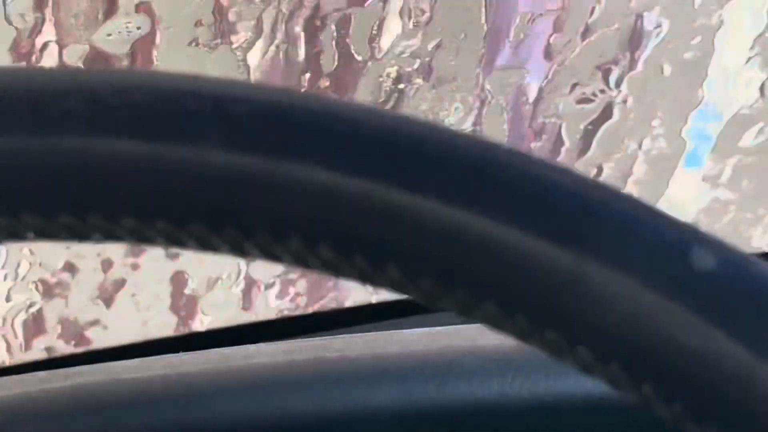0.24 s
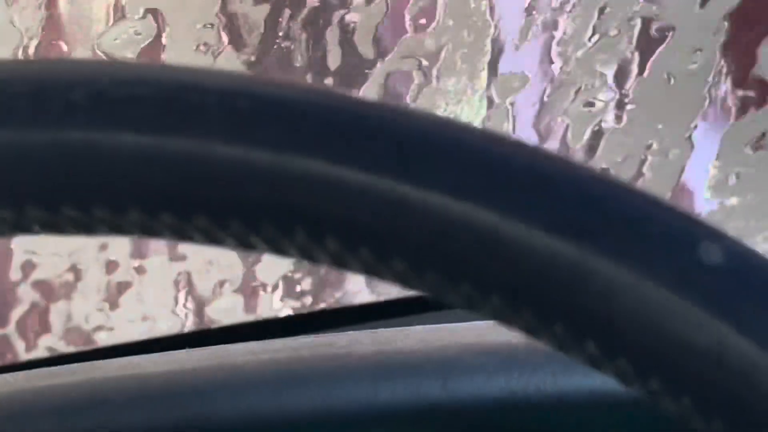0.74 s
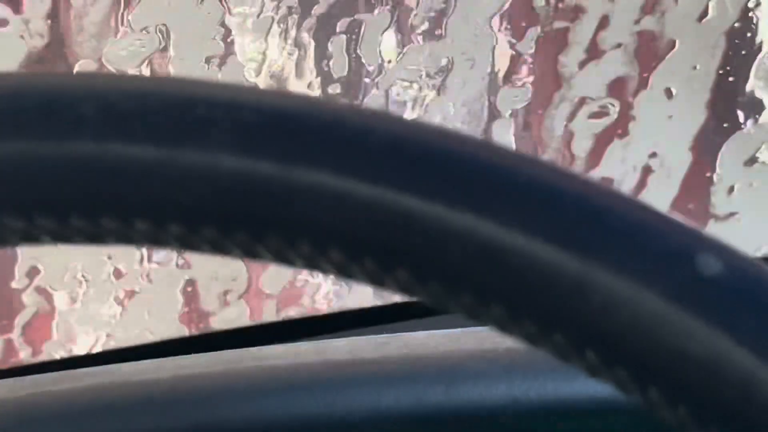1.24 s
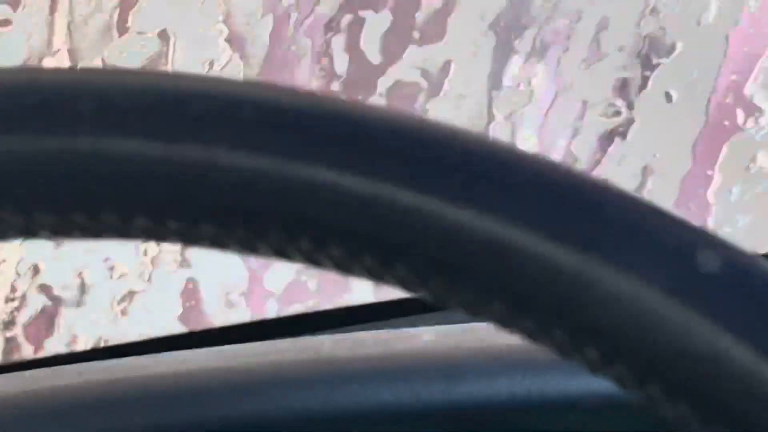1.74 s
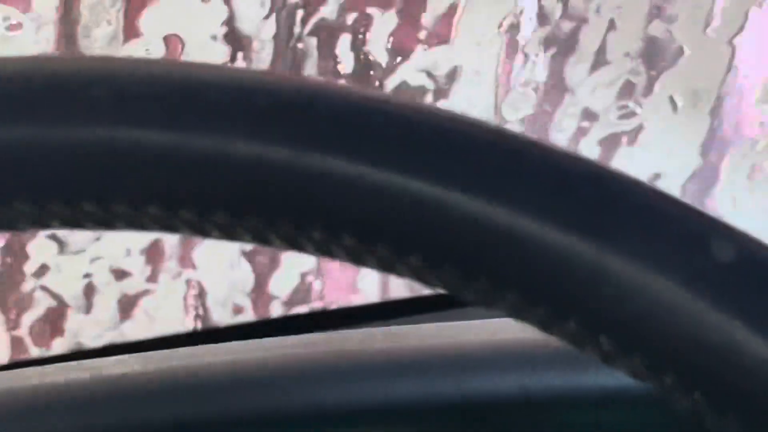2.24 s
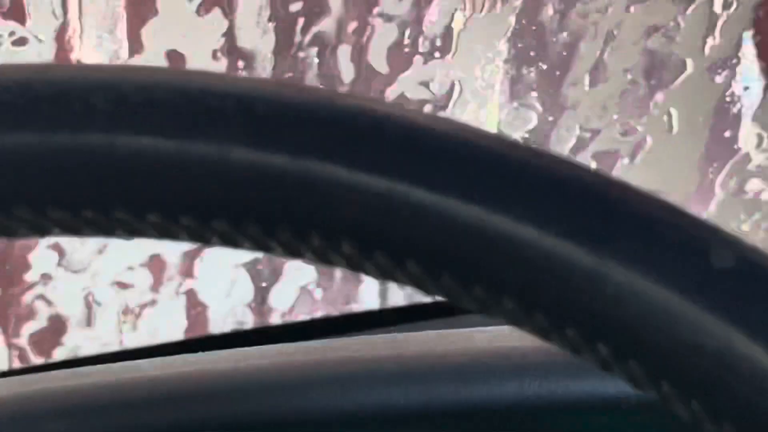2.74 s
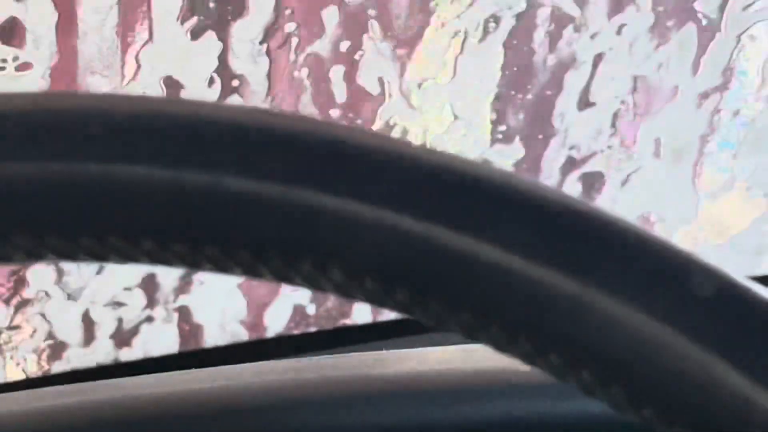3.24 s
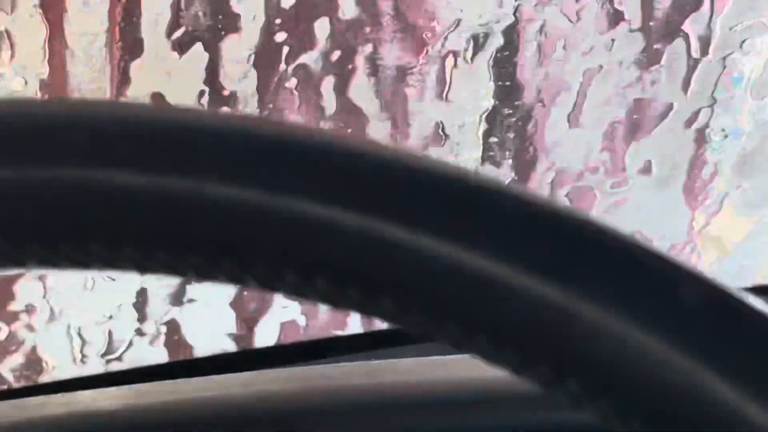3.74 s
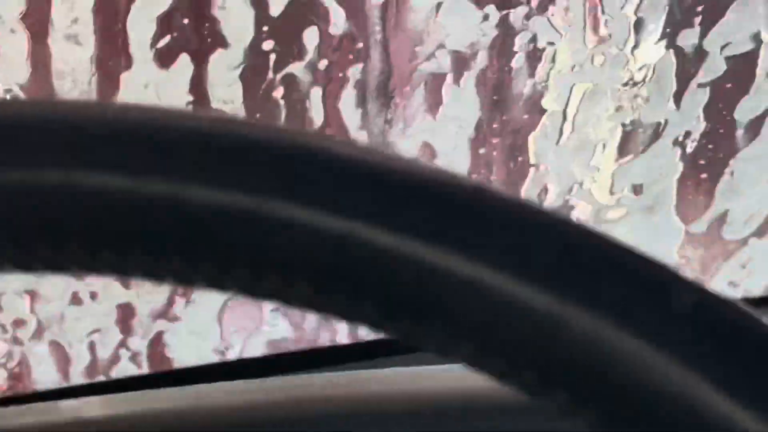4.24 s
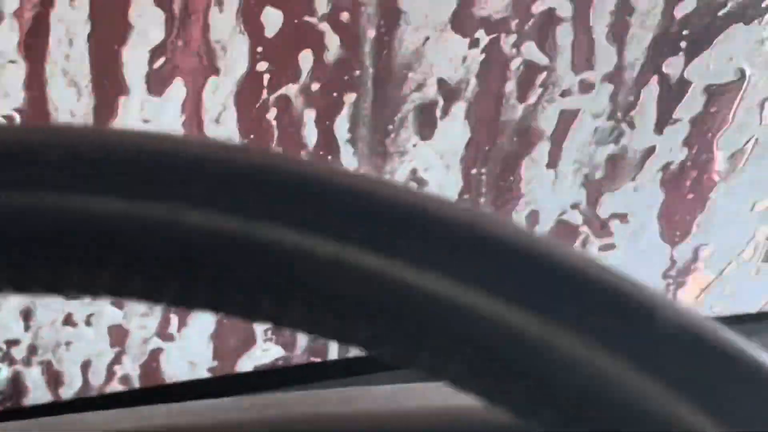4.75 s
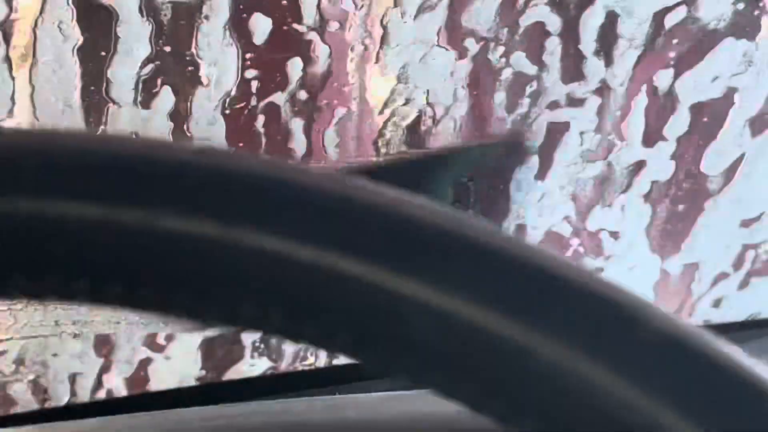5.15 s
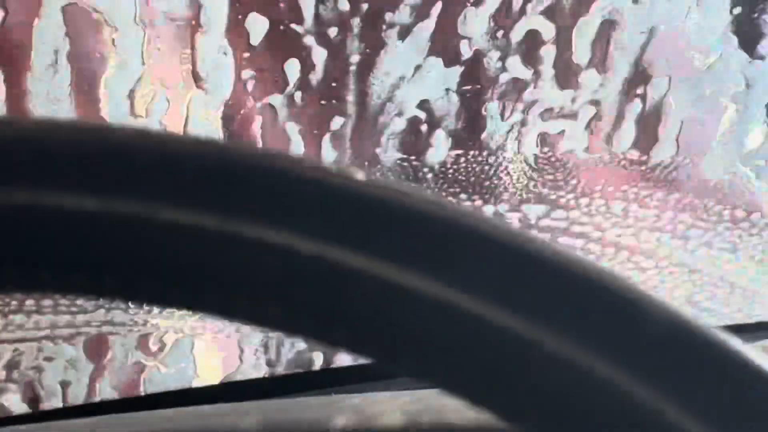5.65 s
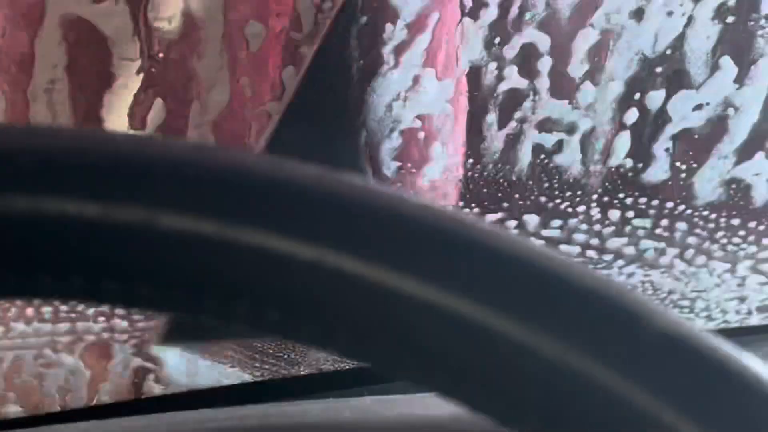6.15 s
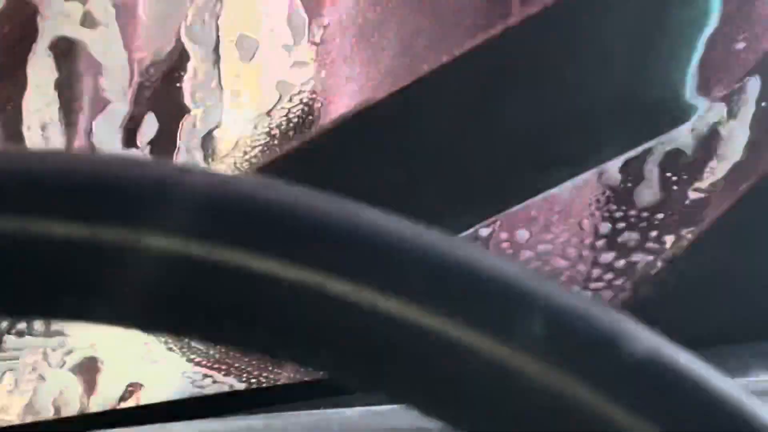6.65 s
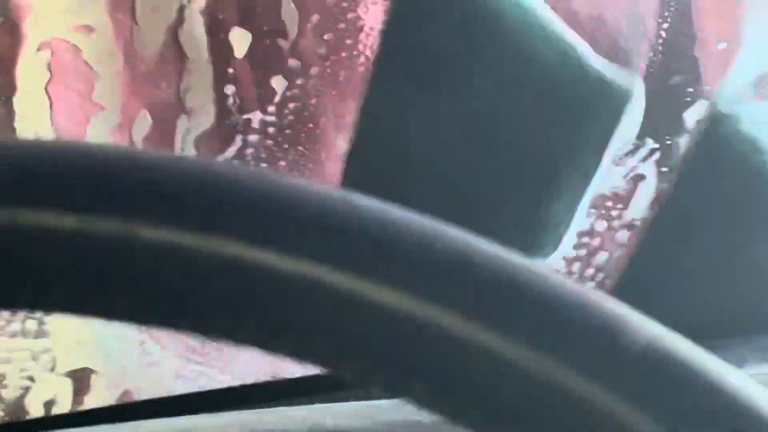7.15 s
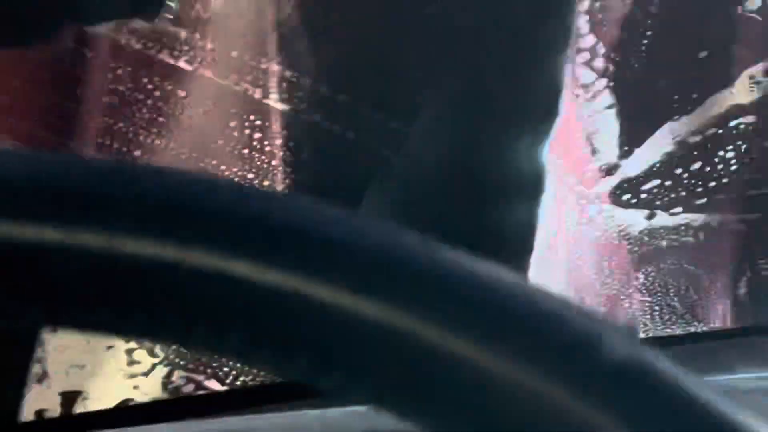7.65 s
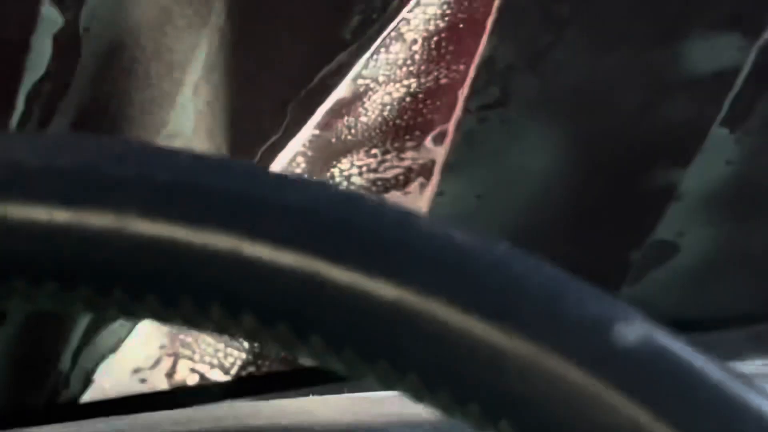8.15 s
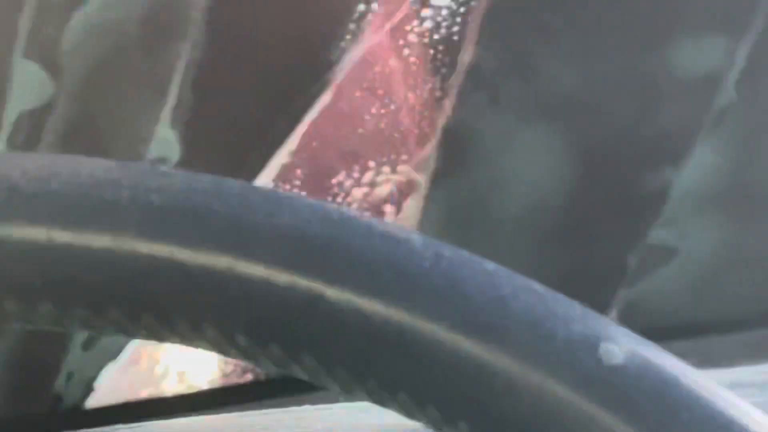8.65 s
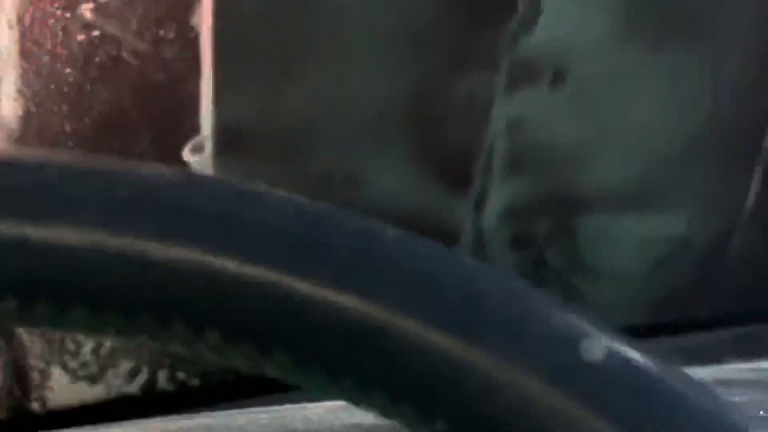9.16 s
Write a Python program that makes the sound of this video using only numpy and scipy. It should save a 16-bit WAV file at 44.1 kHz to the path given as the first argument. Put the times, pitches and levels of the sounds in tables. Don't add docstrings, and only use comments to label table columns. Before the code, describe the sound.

Inside a closed car in a wash tunnel, deep machinery throb and pump hum under steady water rumble, with wet cloth strips slapping the glass.

```python
import sys
import numpy as np
from scipy import signal
from scipy.fft import rfft, irfft, next_fast_len
from scipy.io import wavfile
from scipy.ndimage import uniform_filter1d, map_coordinates

SR = 44100
rng = np.random.default_rng(int(sys.argv[2]) if len(sys.argv) > 2 else 0)


def unload_wav(signal):
    wavfile.write(
        sys.argv[1],
        SR,
        np.round(np.clip(np.atleast_2d(signal).T, -1, 1) * 32767).astype(np.int16),
    )


def convert_level_to_amplitude(level_db):
    exponent = np.asarray(level_db, float) / 20
    return 10 ** exponent


N = 414981
TIME = np.arange(N) / SR


def unit(x):
    return x / np.sqrt(np.mean(x ** 2) + 1e-20)


def along(points, hz):
    f, v = np.transpose(points)
    return np.interp(np.log(hz + 1), np.log(f + 1), v)


def level_curve(rows):
    s, db = np.transpose(rows)
    return np.interp(TIME, s, db)


def wobble(rate):
    knots = rng.standard_normal(N // 1000)
    return map_coordinates(knots, [TIME * rate])


def filtered(x, response):
    m = next_fast_len(N + SR // 2)
    spectrum = rfft(x, m) * response(np.fft.rfftfreq(m, 1 / SR))
    return irfft(spectrum, m)[..., :N]


def tone(hz, db, drift):
    phase = 2 * np.pi * (np.cumsum(hz * np.ones(N)) / SR + rng.random()) + drift * wobble(1.491)
    direct = np.sin(phase)
    around = 0.64 * np.cos(phase + wobble(0.85))
    return np.sqrt(2) * convert_level_to_amplitude(db) * np.array([direct, around])


def beat(hz, in_step_s):
    weaker = 0.7
    turn = 2 * np.pi * hz * (TIME - in_step_s)
    return 10 * np.log10(1 + weaker ** 2 + 2 * weaker * np.cos(turn) + 1e-4)


# time in seconds, level in dB, half length in seconds.
VANE_SWELLS = [(0.266, -31.5, 0.11), (0.833, -28.5, 0.037), (1.317, -27, .07), (1.89, -30.5, 0.095),
               (2.144, -28.5, 0.055), (2.69, -38.5, 0.12), (3.215, -30.5, 0.21), (3.59, -27, 0.22),
               (4.054, -29.5, 0.1), (4.518, -36, .25), (5.38, -29, 0.071), (5.69, -28.5, 0.094),
               (6.315, -31.5, 0.12), (6.548, -29, .12), (7.326, -40.5, 0.36), (7.907, -32, 0.13),
               (8.216, -33.5, 0.072), (8.53, -32.5, 0.17), (8.965, -34, .1)]


def whine_swells():
    t = np.arange(0, N, 64) / SR
    gain = convert_level_to_amplitude(-38.5)
    for s, db, half_s in VANE_SWELLS:
        gain = gain + convert_level_to_amplitude(db) * np.exp(-((t - s) / half_s) ** 2)
    return np.interp(TIME, t, 20 * np.log10(gain))


# time in seconds, throb level in dB.
DRIVE_LOAD = [(0.0, -15.5), (1.8, -16.5), (2.1, -18.5), (4.2, -21.5), (4.45, -14.5), (5.0, -18.5),
              (6.0, -18.5), (7.1, -19), (7.4, -12.5), (7.68, -21.5), (7.95, -14), (8.5, -21), (9.28, -14),
              (9.41, -17)]
# order as a multiple of shaft speed, rms level in dB.
DRIVE_ORDERS = [(5, -27.5), (6, -28), (7, -29), (13, -33), (16, -36.5), (17, -41.5)]
PUMP_ORDERS = [(3, -32.5), (4, -34.5), (5, -44), (6, -40.5), (7, -47)]
FAN_ORDERS = [(1, -29.5), (2, -45)]


def machinery():
    drive_hz, pump_hz, fan_hz = 8.846, 59.13, 156.6
    throb = tone(8 * drive_hz, level_curve(DRIVE_LOAD), drift=0.2)

    shaft = tone(pump_hz, -27 + beat(0.23, in_step_s=2.4), drift=0.3)
    second_db = -28 + beat(0.17, in_step_s=5.2) + 1.5 * wobble(3.5)
    second = tone(2 * pump_hz, second_db, drift=0.53)

    whine_db = whine_swells()
    whine = tone(8 * pump_hz, whine_db, drift=0.6) + tone(16 * pump_hz, whine_db - 20, drift=2)

    hum = throb + shaft + second + whine
    for shaft_hz, orders in ((drive_hz, DRIVE_ORDERS), (pump_hz, PUMP_ORDERS), (fan_hz, FAN_ORDERS)):
        for order, db in orders:
            hum = hum + tone(order * shaft_hz, db + 2.5 * wobble(1.2), drift=0.6)
    return hum


# time in seconds, peak level in dB, centre in Hz, 60 dB decay time in seconds.
STRIP_SLAPS = [(1.72, -43.5, 4460, .04), (2.02, -46.5, 9000, 0.034), (3.058, -33, 4300, .016),
               (3.9, -48, 10000, 0.045), (3.949, -49.5, 8500, .03), (4.39, -51, 11600, .05),
               (4.809, -50, 9020, 0.085), (4.834, -49.5, 11000, 0.046), (4.911, -44, 6500, .05),
               (5.05, -43.5, 4170, .06), (5.54, -46.5, 5960, 0.054), (5.7, -39, 4270, 0.028),
               (5.734, -30, 4600, .035), (5.748, -41.5, 4000, .03), (6.057, -40.5, 5060, 0.063),
               (6.085, -38, 5200, .04), (6.608, -32, 3000, 0.028), (6.704, -38, 4500, .027),
               (7.048, -47.5, 4540, 0.24), (7.072, -31.5, 2760, .05), (7.199, -37, 3300, .04),
               (7.212, -28, 3100, .025), (7.58, -45, 6000, .03), (9.298, -31.5, 1280, .1)]


def splatter_colour(hz, centre_hz):
    height = centre_hz / 4000
    octaves = 0.52 * height ** 0.5
    droplets = 1 + 0.2 * (hz / centre_hz) ** 1.4
    body = droplets / (1 + (np.log2(hz / centre_hz) / octaves) ** 4)
    mist = 0.12 * height ** 2 / (1 + (9000 / hz) ** 4)
    return body + mist


def cloth():
    out = np.zeros((2, N + SR))
    t = np.arange(SR // 4) / SR
    hz = np.fft.rfftfreq(len(t), 1 / SR) + 1
    for s, db, centre_hz, t60 in STRIP_SLAPS:
        noise = rng.standard_normal((2, len(t)))
        burst = unit(irfft(rfft(noise) * splatter_colour(hz, centre_hz), len(t)))
        decay = convert_level_to_amplitude(db - 2.5 - 60 * t / max(t60, 0.004))
        rise = 1 - np.exp(-t / 0.0007)
        start = round(s * SR)
        out[:, start:start + len(t)] += decay * rise * burst
    return out[:, :N]


def rush(spectrum, patchy_db):
    z = signal.stft(rng.standard_normal((2, N)), nperseg=512)[2]
    field = uniform_filter1d(rng.standard_normal(z.shape[1:]), size=8, axis=0)
    field = uniform_filter1d(field, size=12, axis=1)
    pair = signal.istft(z * convert_level_to_amplitude(patchy_db * unit(field)), nperseg=512)[1][:, :N]
    return unit(filtered(pair, lambda hz: convert_level_to_amplitude(along(spectrum, hz))))


# time in seconds, flow level in dB.
WATER_FLOW = [
    (0.0, 0.5),
    (1.5, 0.3),
    (4.5, 0.5),
    (7.5, 1.3),
    (9.0, 1.5),
    (9.41, 2),
]
# frequency in Hz, density in dB per Hz.
RUMBLE_SPECTRUM = [(18, -26), (32, -14), (42, -6), (75, -0.5), (100, 0), (140, -5.5), (200, -8), (270, -11),
                   (355, -12), (385, -17), (500, -15.5), (600, -21), (750, -30), (1100, -67)]
ROAR_SPECTRUM = [(400, -31.5), (640, -2.5), (720, -2), (950, -1), (1030, -5.5), (1250, -6), (1580, -8.5),
                 (1640, -12), (1700, -9), (1980, -10.5), (2150, -15), (2500, -16), (3200, -20), (5000, -52)]
SPRAY_SPECTRUM = [(1800, -14), (2600, -1.5), (3200, -2.5), (3700, 2), (4300, -0.5), (5500, -4.5),
                  (7000, -9), (8400, -12.5), (10500, -17.5), (11800, -24), (12600, -31), (13300, -33.5),
                  (14400, -37.5)]


def water():
    flow_db = level_curve(WATER_FLOW)
    gush_db = 0.3 * wobble(9)
    rumble_db = -17.5 + 0.55 * flow_db
    roar_db = -34.5 + flow_db + gush_db
    spray_db = -50.5 + 0.2 * flow_db + gush_db + 0.43 * wobble(25)
    rumble = convert_level_to_amplitude(rumble_db) * rush(RUMBLE_SPECTRUM, patchy_db=0.5)
    roar = convert_level_to_amplitude(roar_db) * rush(ROAR_SPECTRUM, patchy_db=0.5)
    spray = convert_level_to_amplitude(spray_db) * rush(SPRAY_SPECTRUM, patchy_db=0.5)
    return rumble + roar + spray


# frequency in Hz, likeness from 0 to 1.
PORT_LIKENESS = [(60, 1), (170, 1), (250, 0.63), (360, 0.96), (480, 0.53), (650, 0.58), (730, 0.16),
                 (1000, .4), (1400, 0.18), (1750, 0.67), (3000, 0.95), (5000, 0.88), (6500, 0.83),
                 (8400, 0.62), (9600, 0.37), (12000, 0.57), (13800, .6)]
# frequency in Hz, lag of the left port in radians.
PORT_LAG = [(600, 0), (800, .9), (900, 0), (1000, .7), (1120, -.1), (1400, 3), (1600, 3.3), (1720, 5.9),
            (3300, 6.1), (5200, 6.5), (5700, 7.2), (6700, 7.25), (7400, 8), (7900, 9.2), (8900, 9.6),
            (11000, 12.3), (13000, 12.9), (14500, 15.5)]
# frequency in Hz, left minus right level in dB.
PORT_TILT = [(60, -1), (160, 4), (235, -0.5), (380, 3), (700, 0.5), (1200, -2.5), (1600, -7.5),
             (2200, -3.5), (3300, 0.5)]


def share(hz):
    turn = np.arccos(np.clip(along(PORT_LIKENESS, hz), 0, 1)) / 2
    return np.array([np.cos(turn), np.sin(turn)])


def port_responses(hz):
    half = convert_level_to_amplitude(along(PORT_TILT, hz) / 2) * np.exp(-0.5j * along(PORT_LAG, hz))
    return np.array([half, 1 / half])


def scene():
    common, opposed = filtered(machinery() + cloth() + water(), share)
    return filtered(np.array([common + opposed, common - opposed]), port_responses)


# lower edge in Hz, upper edge in Hz, flicker of the edges in Hz.
MISSING_BANDS = [
    [(7720, 9150, 190), (14050, 20000, 380)],
    [(3200, 5250, 200), (10700, 13300, 200)],
]


def missing_bands(x):
    hz, _, z = signal.stft([x[0] + x[1], x[0] - x[1]], SR, nperseg=1024)
    hz, keep = hz[:, None], np.ones(z.shape)
    frames = z.shape[2]
    for row, bands in enumerate(MISSING_BANDS):
        for low_hz, high_hz, flicker_hz in bands:
            edge = flicker_hz * np.repeat(rng.standard_normal((2, frames)), 2, axis=1)[:, :frames]
            keep[row] *= (hz < low_hz + edge[0]) | (hz > high_hz + edge[1])
    both, apart = signal.istft(z * keep, SR, nperseg=1024)[1][:, :N] / 2
    return np.array([both + apart, both - apart])


def band_limit(x):
    return signal.sosfilt(signal.butter(12, 14410, fs=SR, output="sos"), x)


def record(dry):
    held = dry / (1 + np.abs(dry / 0.95) ** 5) ** (1 / 5)
    limited = filtered(held, lambda hz: hz < 15750)
    mix = missing_bands(limited)
    return band_limit(mix)


dry = scene()
out = record(dry)
unload_wav(out)
```